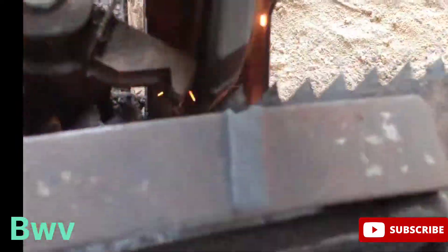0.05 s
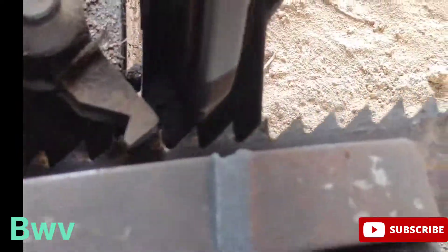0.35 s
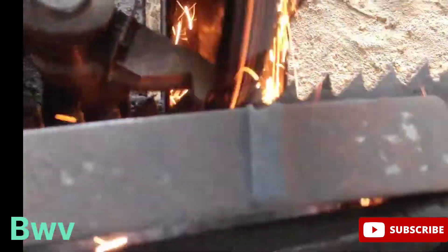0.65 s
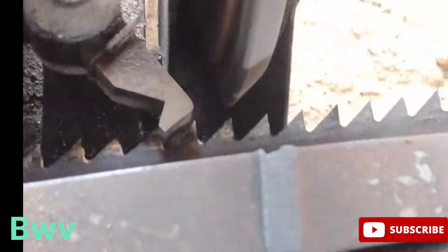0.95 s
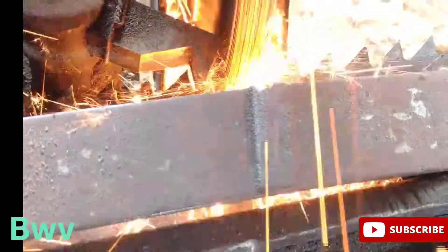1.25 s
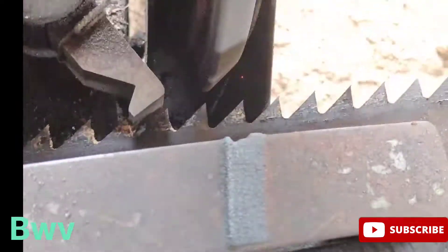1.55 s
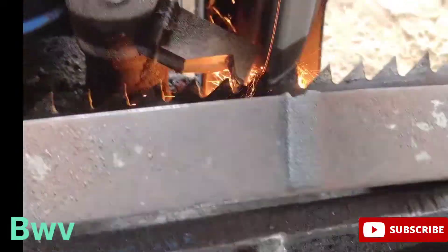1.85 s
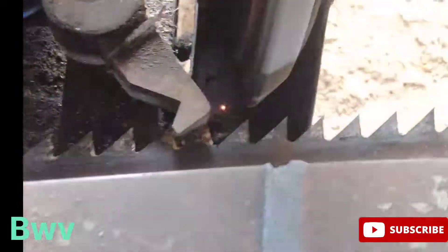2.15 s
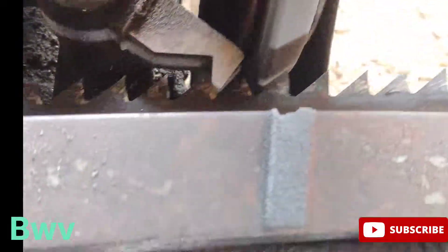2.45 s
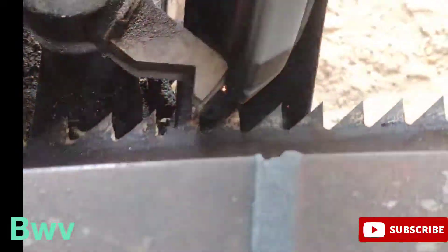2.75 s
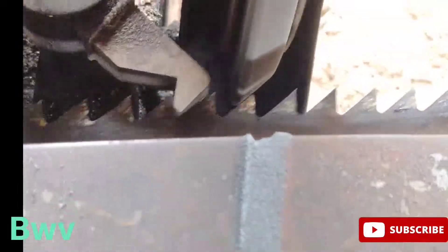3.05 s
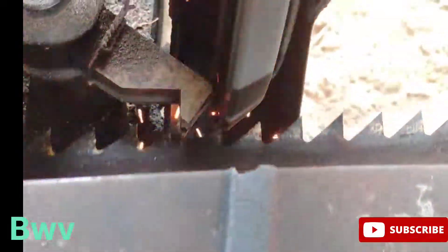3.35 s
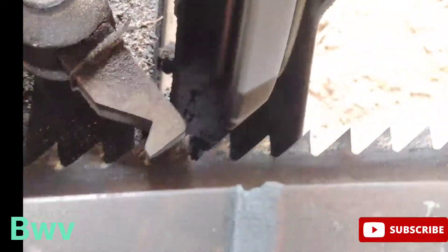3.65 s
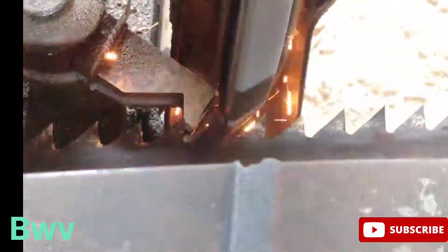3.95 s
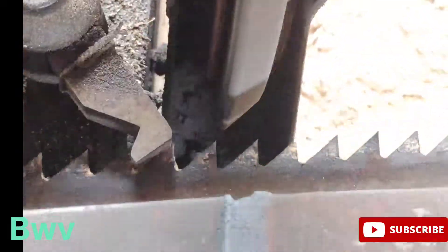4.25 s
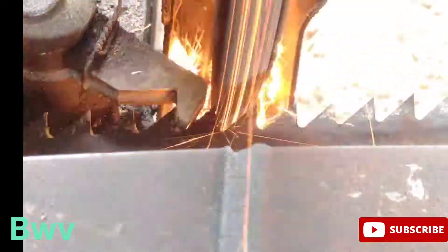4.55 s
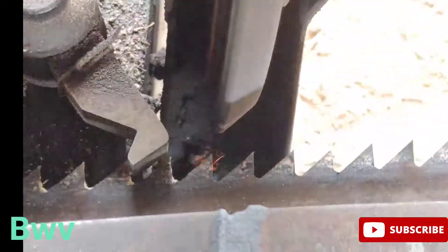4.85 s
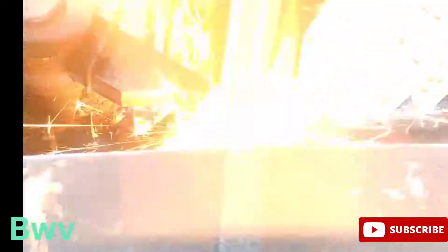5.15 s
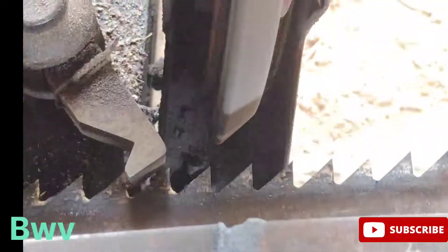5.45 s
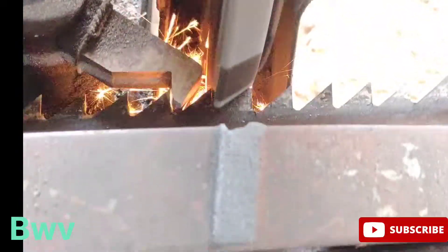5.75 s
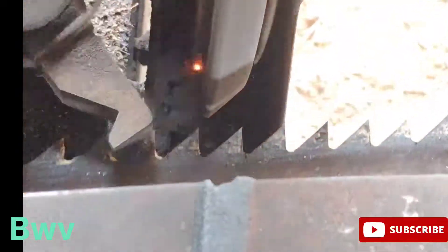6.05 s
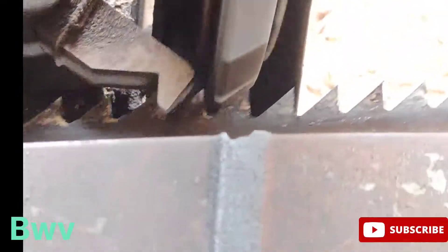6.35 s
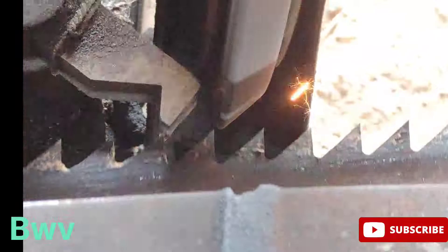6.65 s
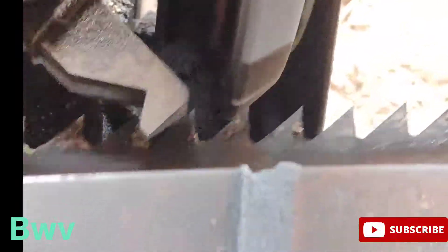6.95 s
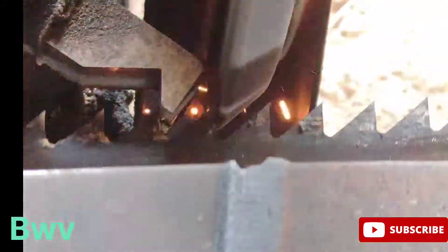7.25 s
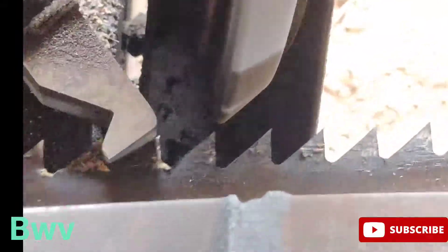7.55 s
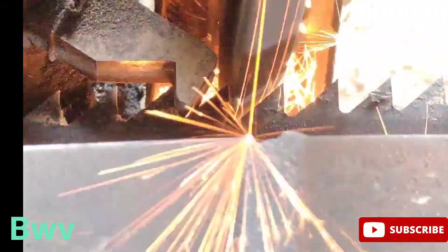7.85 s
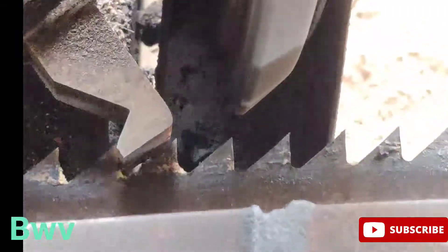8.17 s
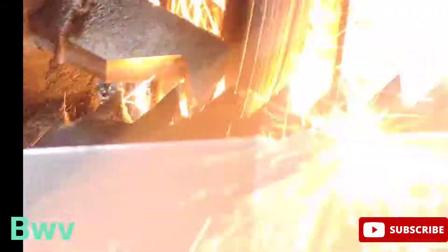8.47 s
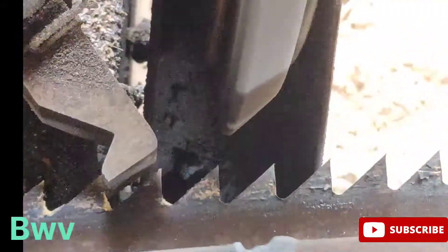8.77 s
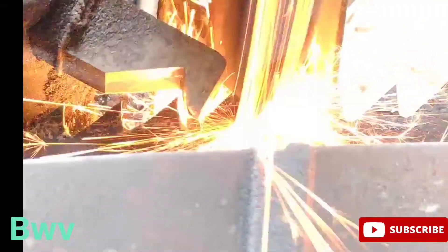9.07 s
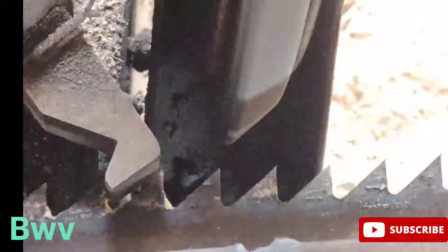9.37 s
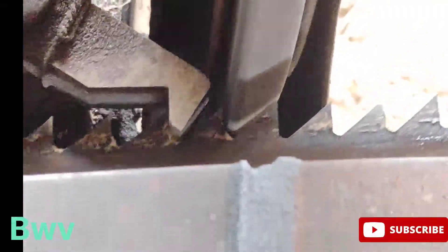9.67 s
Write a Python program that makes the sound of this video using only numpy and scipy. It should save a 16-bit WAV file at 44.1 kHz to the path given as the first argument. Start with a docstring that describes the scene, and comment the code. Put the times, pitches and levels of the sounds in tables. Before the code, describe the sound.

A sharpening machine works along a band saw blade in a workshop. About three times every two seconds the grinding wheel bites a tooth with a short, bright, rasping hiss, and the steel rings briefly. Between strokes the feed pawl clicks onto the next tooth and the blade chatters in its guide. A motor hums and whirrs underneath. The microphone is close, and many strokes hit it with a low puff of air.

```python
"""A grinding wheel sharpens a band saw blade, dipping into a tooth every 0.66 s: abrasion makes a hiss,
air thrown off with the sparks buffets the microphone, and the blade's resonances ring on.
Between strokes the feed pawl drops onto the next tooth and sometimes rebounds, the linkage knocks, and
the steel chatters in its guide. Behind them the motor hums and the workshop reverberates.
The gain control of a nearby camera ducks the machine under every stroke."""
import sys
import numpy as np
from scipy import signal
from scipy.fft import rfft, irfft, next_fast_len
from scipy.io import wavfile
from scipy.ndimage import uniform_filter1d, map_coordinates

SR = 44100
rng = np.random.default_rng(int(sys.argv[2]) if len(sys.argv) > 2 else 0)


def pcm_store(signal):
    """Save signal as 16-bit PCM."""
    levels = np.round(np.clip(np.atleast_2d(signal), -1, 1) * 32767)
    wavfile.write(sys.argv[1], SR, levels.astype(np.int16).T)


N = 428211
TIME = np.arange(N) / SR
CAM_PERIOD_S, FIRST_CUT_S = 0.6554, -0.003

# the wheel meets a tooth: (time [s], cut level [dB], first touch level [dB], air blast level [dB])
WHEEL_STROKES = [(-0.05, 4, -14, -5.5), (0.5907, 2.5, -7, -37), (1.259, 3.5, -11, -12.5),
                 (1.9126, 6, -4, -6), (2.55, 5, -12, -11), (3.2242, 2.5, -7, -28.5), (3.875, 3, -13, -9),
                 (4.5287, 4.5, -12, -6), (5.1846, 4, -9, -10.5), (5.8332, 2, -9, -17.5),
                 (6.495, 5, -12, -6.5), (7.152, 5, -6, -5.5), (7.812, 4.5, -4, -10.5), (8.469, 3, -3, -8.5),
                 (9.1284, 5, -9, -8.5)]
# the pawl drops onto the next tooth: (time [s], level [dB], click decay t60 [s])
PAWL_DROPS = [(0.2532, -14.5, 0.058), (0.913, -23.5, 0.053), (1.5665, -10.5, 0.017), (2.207, -34, 0.043),
              (2.857, -24, 0.078), (3.524, -15.5, 0.077), (4.1726, -11, 0.021), (4.8365, -11.5, 0.027),
              (5.4888, -11.5, 0.06), (6.1462, -17.5, 0.083), (6.8013, -7.5, 0.017), (7.4635, -11.5, 0.02),
              (8.1136, -13, 0.064), (8.776, -24.5, 0.043), (9.4288, -12, 0.04)]
# likeness of the machine's sound at the two microphone ports: (frequency [Hz], coherence [-])
PORT_COHERENCE = [(100, 0.53), (1000, 0.41), (2500, 0.38), (4500, 0.094), (12000, 0.053)]
# balance of the wheel, and of the steel behind it: (frequency [Hz], left minus right [dB])
WHEEL_BALANCE = [(2500, 1.5), (5000, -1), (6500, -5), (8500, -1), (10500, 2.5), (14000, 3)]
STEEL_BALANCE = [(1000, -0.5), (3200, 5.5), (5500, 1), (7500, -2.5), (9000, 5.5), (10500, 6), (14000, 18)]


def amp(db):
    """Decibels to amplitude ratio."""
    return 10 ** (np.asarray(db) / 20)


def unit(x):
    """Normalisation to rms 1."""
    return x / np.sqrt(np.mean(x ** 2) + 1e-20)


def along(points, hz):
    """Interpolation of (frequency [Hz], value) points on a logarithmic frequency axis."""
    freqs, values = np.transpose(points)
    return np.interp(np.log(hz + 1), np.log(freqs + 1), values)


def colour(points):
    """Magnitude response through (frequency [Hz], level [dB]) points."""
    return lambda hz: amp(along(points, hz))


def modal(modes):
    """Modal superposition: the summed response of damped resonators of alternating sign."""
    return lambda hz: sum((-1) ** k * amp(db) * 1j * hz * width / (f0 ** 2 - hz ** 2 + 1j * hz * width)
                          for k, (f0, width, db) in enumerate(modes))


def filtered(x, response):
    """Linear filtering: the spectrum of x times a frequency response."""
    size = next_fast_len(N + SR // 2)
    return irfft(rfft(x, size) * response(np.fft.rfftfreq(size, 1 / SR)), size)[..., :N]


def wobble(rate):
    """Smooth random modulation with rate knots a second."""
    return map_coordinates(rng.standard_normal(int(N * rate / SR) + 4), [TIME * rate])


def fade(start, t60):
    """Exponential decay from start, losing 60 dB in t60 seconds."""
    envelope = np.zeros(N)
    onset = round(start * SR)
    t = TIME[:SR][:N - onset]
    envelope[onset:][:len(t)] = np.exp(-np.log(1000) * t / t60)
    return envelope


def noise(response, balance, lag_ms, patchy_db, size=512, coherence=PORT_COHERENCE):
    """Partly coherent stereo noise of rms 1, patchy in time and frequency; the left lags by lag_ms."""
    cells = signal.stft(rng.standard_normal((2, N)), nperseg=size)[2]
    patches = uniform_filter1d(rng.standard_normal(cells.shape[1:]), 3, axis=0)
    patches = uniform_filter1d(patches, 14, axis=1)
    pair = signal.istft(cells * amp(patchy_db * unit(patches)), nperseg=size)[1][:, :N]
    length = next_fast_len(N)
    hz = np.fft.rfftfreq(length, 1 / SR)
    angle = np.arccos(along(coherence, hz)) / 2
    mid, side = rfft(pair, length) * response(hz) * [np.cos(angle), np.sin(angle)]
    lean = amp(along(balance, hz) / 2) * np.exp(-1j * np.pi * hz * lag_ms / 1000)
    ports = np.array([(mid + side) * lean, (mid - side) / lean]) / np.hypot(abs(lean), 1 / abs(lean))
    return unit(irfft(ports, length)[:, :N])


def ring_on(drive, t60):
    """Energy storage: the envelope of driven steel that loses its energy through damping."""
    retained = np.exp(-2 * np.log(1000) / (t60 * SR))
    return np.sqrt(signal.lfilter([1 - retained], [1, -retained], drive ** 2))


def bend(x, stretch):
    """Resampling shifts pitch by the fraction by which stretch departs from its mean."""
    position = np.cumsum(1 + stretch - stretch.mean())
    return np.array([map_coordinates(port, [position], order=3, mode="mirror") for port in x])


def deepest_cut(start):
    """Periodic cam motion: the time nearest to start at which the wheel is lowest."""
    return FIRST_CUT_S + CAM_PERIOD_S * np.round((start - FIRST_CUT_S) / CAM_PERIOD_S)


def wheel_throb(turn_hz, drift):
    """Rotational modulation: the slightly uneven wheel throbs once a turn."""
    return np.sin(2 * np.pi * np.cumsum(turn_hz * (1 + drift * wobble(3))) / SR)


def workshop(x):
    """Reverberation: wall reflections form a diffuse tail, each frequency decaying at its own rate."""
    # reverberation time: (frequency [Hz], t60 [s])
    decay_times = [(200, 0.13), (2500, 0.25), (8000, 0.23), (14000, 0.15)]
    hz, t, cells = signal.stft(rng.standard_normal((2, SR // 2)), SR, nperseg=256)
    tail = signal.istft(cells * amp(-60 * t / along(decay_times, hz)[:, None]), SR, nperseg=256)[1]
    return signal.fftconvolve(x, tail / np.linalg.norm(tail[0]), axes=1)[:, :N]


def low_rumble():
    """Rumble: a low, slowly swelling rumble lies under the scene, nearly independent at the two ports."""
    # the low rumble: (frequency [Hz], spectral level [dB])
    rumble_spectrum = [(12, 11.5), (30, -19), (60, -4.5), (120, -43), (400, -60), (1000, -120)]
    swell = amp(-36 + 3 * wobble(3.4))
    return swell * noise(colour(rumble_spectrum), [(100, -1.4)], lag_ms=0, patchy_db=0.5,
                         coherence=[(100, 0.18)])


def motor(throb):
    """Forced vibration: the motor drives the modes of its stand, while wheel and bearings whirr."""
    # resonances of the stand: (frequency [Hz], bandwidth [Hz], level [dB])
    stand_modes = [(69, 51, -7.5), (189.5, 20.4, 3.5), (239.2, 21, 0), (342, 34, -2), (450.6, 37.6, 1),
                   (564, 37, -7), (752, 182, -12.5)]
    # likeness of the hum at the two ports: (frequency [Hz], coherence [-])
    hum_coherence = [(40, 0.21), (130, 0.99), (450, .95), (800, 0.82)]
    # wheel and bearings: (frequency [Hz], spectral level [dB])
    whirr_spectrum = [(300, 0), (700, 0), (1500, 1), (1850, 7), (2800, -6.5), (3500, -3.5), (4150, 0),
                      (4450, 3), (4900, -2), (6200, -1), (7800, -8), (9500, -7), (12000, -14), (14000, -24)]
    hum_level = amp(-37 + 0.18 * wobble(6) + 0.5 * throb)
    hum = noise(modal(stand_modes), [(200, -0.043)], lag_ms=0.02, patchy_db=1, size=2048,
                coherence=hum_coherence)
    whirr_level = amp(-36.5 + 0.82 * throb + 0.94 * wobble(170) + 2.2 * wobble(22))
    whirr = noise(colour(whirr_spectrum), STEEL_BALANCE, lag_ms=0.35, patchy_db=3, size=1024)
    return hum_level * hum + whirr_level * whirr


def feed_knocks():
    """Impact and rebound: the envelope of the pawl rebounding after a drop and the linkage knocking."""
    # pawl rebounds and the louder knocks of the linkage: (time [s], level [dB])
    rebounds_and_knocks = [(0.9314, -18), (3.5644, -12), (4.485, -13), (5.5594, -16), (5.7029, -11),
                           (6.481, -9), (7.7316, -13.5), (8.8014, -13), (9.104, -13)]
    # two lighter knocks fall at random in the part of each cam turn where the pawl pushes
    cuts = np.repeat([deepest_cut(start) for start, *_ in WHEEL_STROKES], 2)
    times = cuts + CAM_PERIOD_S * rng.uniform(0.45, 0.96, len(cuts))
    levels_db = rng.normal(-22, 2.5, len(cuts))
    light_knocks = [(start, db) for start, db in zip(times, levels_db) if 0 < start < TIME[-1]]
    return sum(amp(db) * fade(start, t60=0.11) for start, db in list(rebounds_and_knocks) + light_knocks)


def guide_chatter(throb, knocks):
    """Contact rattle: pawl, linkage and wheel shake the blade in its guide; their energies add."""
    # resonances of the blade in its guide: (frequency [Hz], bandwidth [Hz], level [dB])
    guide_modes = [(2272, 61, -2.5), (2436, 94, 0), (2621, 200, -4.5), (2770, 160, -22)]
    chatter, slaps, push = np.zeros((3, N))
    for start, db, t60 in PAWL_DROPS:
        energy_db = db + 10 * np.log10(t60)
        chatter += amp(-13 + 0.48 * energy_db) * fade(start, t60=0.75)
        slaps += amp(db - 11) * fade(start + 0.005, t60=0.02)  # the blade slaps its guide
        push += fade(start, t60=1.0)
    # the blade buzzes once a wheel turn, and in small random taps
    buzz = amp(0.57 * throb + 1.6 * wobble(130) + 1.8 * wobble(15))
    cuts = sum(amp(db) * fade(max(deepest_cut(start), 0), t60=0.15) for start, db, *_ in WHEEL_STROKES)
    shaken = amp(-18.5) * ring_on(cuts, t60=0.76)
    buzz_energy = (amp(-41) ** 2 + chatter ** 2 + shaken ** 2) * buzz ** 2
    envelope = np.sqrt(buzz_energy + (amp(-14) * knocks) ** 2 + slaps ** 2)
    balance = [(2000, 3.2), (2450, 9.2), (3200, 8.4)]
    tone = noise(modal(guide_modes), balance, lag_ms=0.43, patchy_db=3, size=2048)
    # the pawl's push raises the blade's tension: the pitch jumps, then sags
    return envelope * bend(tone, 0.0396 * push)


def feed_clicks(knocks):
    """Impact excitation: brief contacts of pawl and linkage radiate broadband clicks from the steel."""
    # the pawl's click: (frequency [Hz], spectral level [dB])
    click_spectrum = [(150, -3), (700, -4), (1400, -0.5), (2500, 7.5), (3300, 3.5), (4200, 4.5), (6000, 4),
                      (8400, -0.5), (10000, -8), (14000, -9)]
    snap_spectrum = [(200, 8), (2000, 1), (4000, -11), (8000, -1), (12000, 1.5)]
    drops = sum(amp(db) * fade(start, t60) for start, db, t60 in PAWL_DROPS)
    snap_level = sum(amp(db + 3) * fade(start, t60=0.0089) for start, db, _ in PAWL_DROPS)
    bounces = amp(2 * wobble(350))
    strikes = (amp(5) * drops + amp(-15.5) * knocks) * bounces
    click_level = np.hypot(strikes, amp(0.5) * ring_on(drops, t60=0.23))
    snap = noise(colour(snap_spectrum), WHEEL_BALANCE, lag_ms=0.344, patchy_db=3)
    balance = [(1000, -1), (2500, 10), (6000, -4.5), (12000, 6)]
    click = noise(colour(click_spectrum), balance, lag_ms=0.354, patchy_db=4.5)
    return snap_level * snap + click_level * click


def pawl_tip(tip_hz, t60, gain_db):
    """Free vibration: the pawl's hard tip pings as a damped sinusoid, its pitch set by where it lands."""
    pings = np.zeros((2, N))
    t = TIME[:SR // 8]
    for start, db, _ in PAWL_DROPS:
        detune, strength, right_phase = rng.standard_normal(3)
        phase = 2 * np.pi * tip_hz * (1 + 0.02 * detune) * t + np.array([[0], [right_phase]])
        envelope = amp(db + gain_db + 2 * strength - 60 * t / t60)
        pings[:, round(start * SR):][:, :len(t)] += envelope * np.sin(phase)
    return pings


def air_blast():
    """Turbulent pressure: air thrown off with the sparks buffets each port almost independently."""
    # the blast of air: (frequency [Hz], spectral level [dB])
    blast_spectrum = [(15, 10.5), (45, 2), (100, -4), (220, -9.5), (500, -12), (1200, -17), (2500, -20),
                      (6000, -55)]
    lead_s, width_s = 0.0025, 0.018  # the gust peaks just ahead of the deepest cut
    swing_hz, settle_s = 2.46, 0.12  # then the pressure swings back in a damped oscillation
    lean_db = np.array([[-2.5], [2.5]])  # stronger at the right port
    gust, swing = np.zeros((2, 2, N))
    for start, _, _, blast_db in WHEEL_STROKES:
        t = TIME - deepest_cut(start)
        ports = amp(blast_db + lean_db - 0.5 * rng.standard_normal((2, 1)))
        gust += ports * np.exp(-0.5 * ((t + lead_s) / width_s) ** 2)
        after = np.maximum(t - 0.03, 0)
        swing -= ports * np.sin(2 * np.pi * swing_hz * after) * np.exp(-after / settle_s)
    buffet = noise(colour(blast_spectrum), [(100, 0)], lag_ms=0, patchy_db=2.5, coherence=[(100, 0.079)])
    return gust * amp(9 + 2.4 * wobble(110)) * buffet + amp(7) * swing


def grinding(throb):
    """Abrasion: the wheel's grit hisses and excites the modes of the tooth, and the blade rings on."""
    # the spray of grit and sparks: (frequency [Hz], spectral level [dB])
    spray_spectrum = [(300, -16.5), (1200, -10.5), (2300, -9.5), (3200, -17), (3750, -4), (4800, -6.5),
                      (6000, -3), (8400, 0), (10500, -1.5), (14000, -4.5)]
    # tooth and blade under the wheel: (frequency [Hz], bandwidth [Hz], level [dB])
    tooth_modes = [(2490, 310, -9.5), (3300, 120, -6), (3750, 85, 1.5), (4420, 810, -8), (5480, 410, -1.5),
                   (6580, 190, -0.5), (7200, 150, -5.5), (8200, 250, 1.5), (9320, 200, -1.5),
                   (9300, 300, -4), (12000, 160, -10.5)]
    # the blade's after-ring: (frequency [Hz], spectral level [dB])
    ring_spectrum = [(2100, -28), (2350, -1), (3050, -5.5), (3600, -9), (5600, -8), (5850, 3), (6050, 3),
                     (6700, 2), (8300, -0.5), (9300, -3), (10500, -8), (14000, -9)]
    # a light touch throws only fine grit, so it is brighter
    graze_spectrum = [(1500, -49), (4000, 1), (8000, 1.5), (14000, 2.5)]
    seating_s, touch_decay_s, bite_width_s = 0.0089, 0.036, 0.023
    bite, touch = np.zeros((2, N))
    for start, cut_db, touch_db, _ in WHEEL_STROKES:  # the rim touches, bites deeper and lifts
        t = TIME - start
        contact = np.clip(t / seating_s + 1, 0, 1) ** 2
        depth = np.exp(-0.5 * ((TIME - deepest_cut(start)) / bite_width_s) ** 2)
        bite += contact * amp(cut_db) * depth
        touch += contact * amp(touch_db) * np.exp(-np.abs(t) / touch_decay_s)
    grit = amp(0.61 * wobble(600) + 0.3 * wobble(90) + 0.52 * throb)
    spray = noise(colour(spray_spectrum), WHEEL_BALANCE, lag_ms=0.36, patchy_db=3)
    rasp = noise(modal(tooth_modes), WHEEL_BALANCE, lag_ms=0.381, patchy_db=4.5, size=1024)
    graze = noise(colour(graze_spectrum), WHEEL_BALANCE, lag_ms=0.333, patchy_db=1.5)
    ring = noise(colour(ring_spectrum), STEEL_BALANCE, lag_ms=0.301, patchy_db=3.5)
    hiss = bite * (amp(2.5) * spray + amp(-4) * rasp) + amp(1.5) * touch * graze
    return grit * hiss + amp(-8) * ring_on(bite, t60=0.34) * ring


def scene():
    """Superposition: the steel's direct sound and reverberation, the motor and the moving air."""
    throb = wheel_throb(turn_hz=47.5, drift=0.057)
    steel = grinding(throb)
    knocks = feed_knocks()
    steel += guide_chatter(throb, knocks) + feed_clicks(knocks)
    steel += pawl_tip(tip_hz=8260, t60=0.031, gain_db=-1.5)
    return steel + amp(-11) * workshop(steel) + motor(throb) + air_blast() + low_rumble()


def gain_control(x, threshold_db, slope, release_db_per_s):
    """Compression: loud sound turns the gain down at once; it climbs back at a steady rate."""
    sensed = filtered(x, lambda hz: hz ** 2 / (hz ** 2 + 60 ** 2))  # less sensitive below 60 Hz
    power = uniform_filter1d(np.mean(sensed ** 2, axis=0), size=180)
    level_db = 10 * np.log10(np.abs(power) + 1e-12)
    needed_db = slope * np.maximum(level_db - threshold_db, 0)
    climb_db = release_db_per_s * TIME
    cut_db = np.maximum.accumulate(needed_db + climb_db) - climb_db
    return x * amp(-uniform_filter1d(cut_db, size=130))


def record(dry):
    """The camera compresses the sound, rounds its peaks by soft saturation and limits its bandwidth."""
    ceiling, top_hz = 0.85, 14280
    ducked = gain_control(dry, threshold_db=-22, slope=0.66, release_db_per_s=90.5)
    rounded = ducked / (1 + (ducked / ceiling) ** 8) ** (1 / 8)
    return filtered(rounded, lambda hz: hz < top_hz)


dry = scene()
out = record(dry)
pcm_store(out)
```